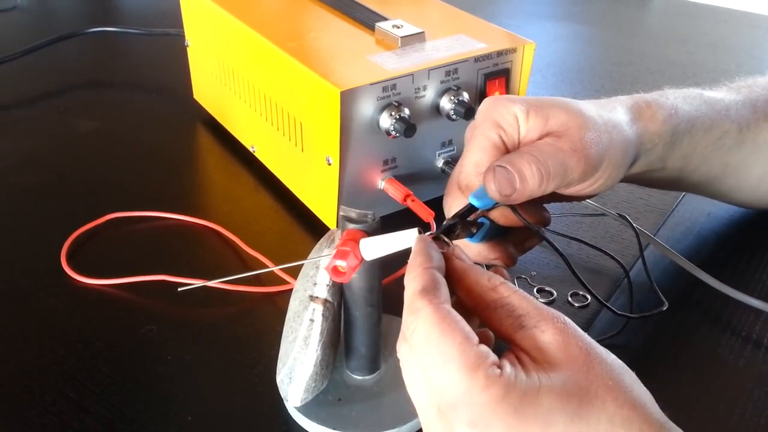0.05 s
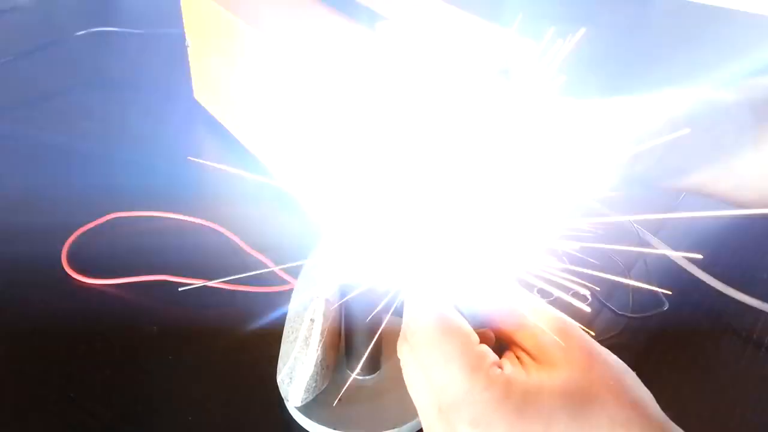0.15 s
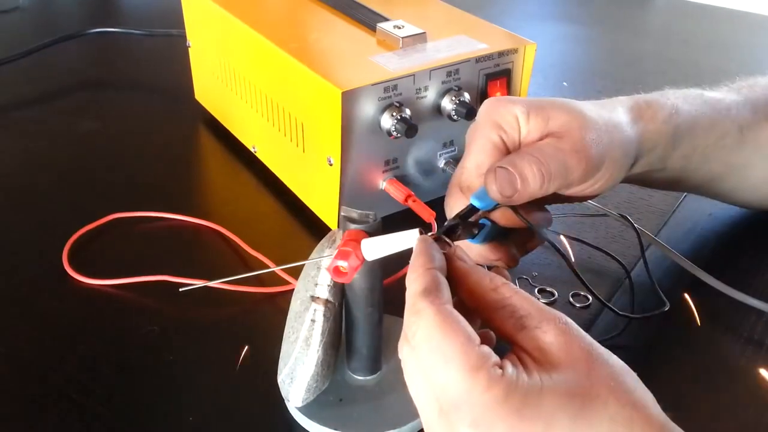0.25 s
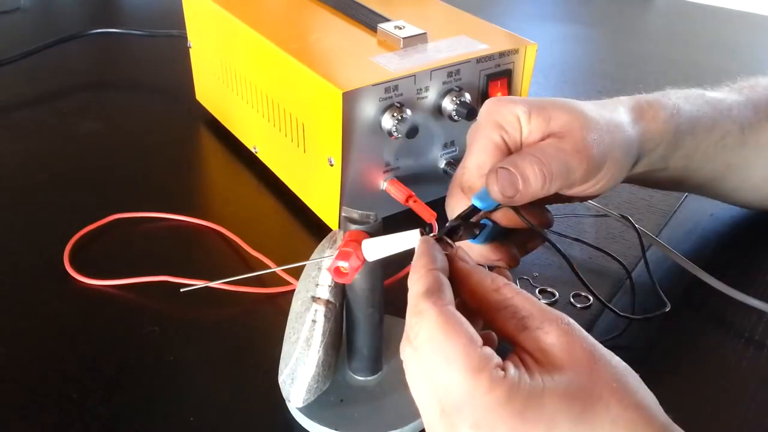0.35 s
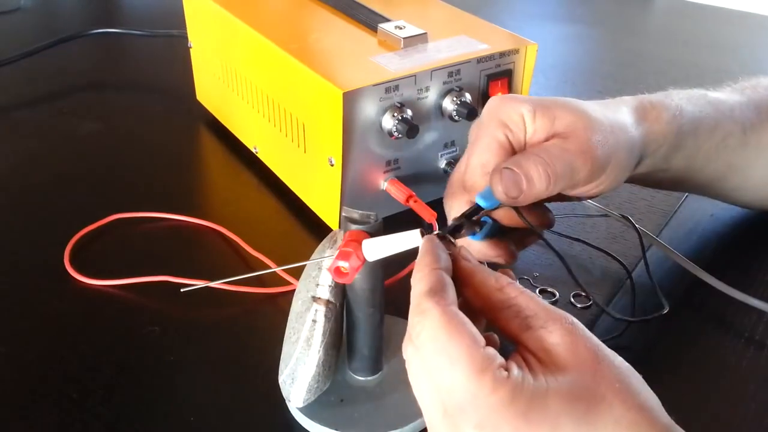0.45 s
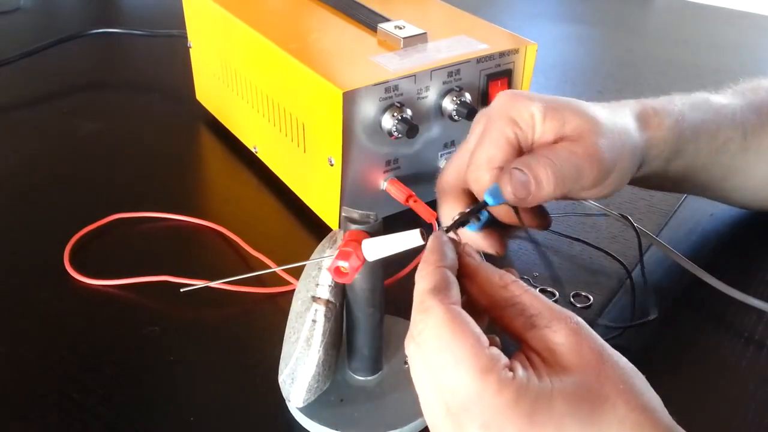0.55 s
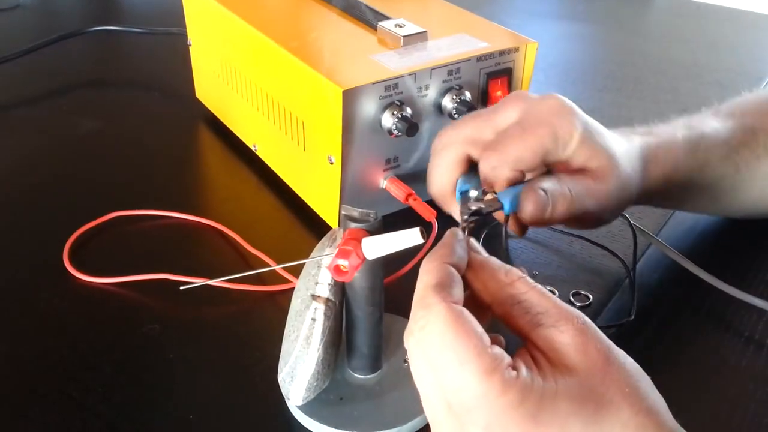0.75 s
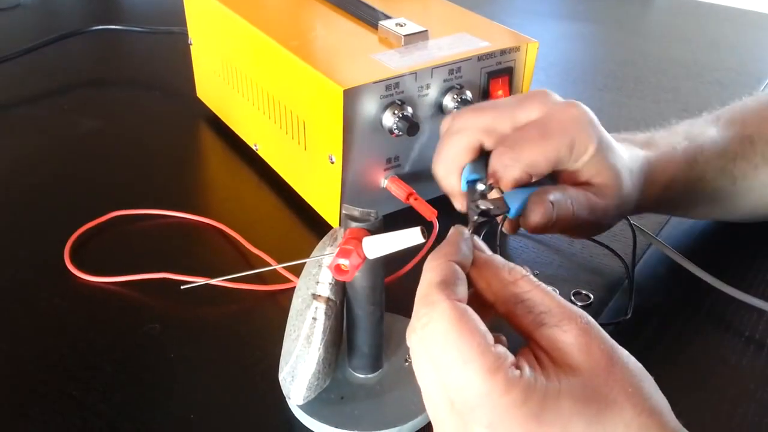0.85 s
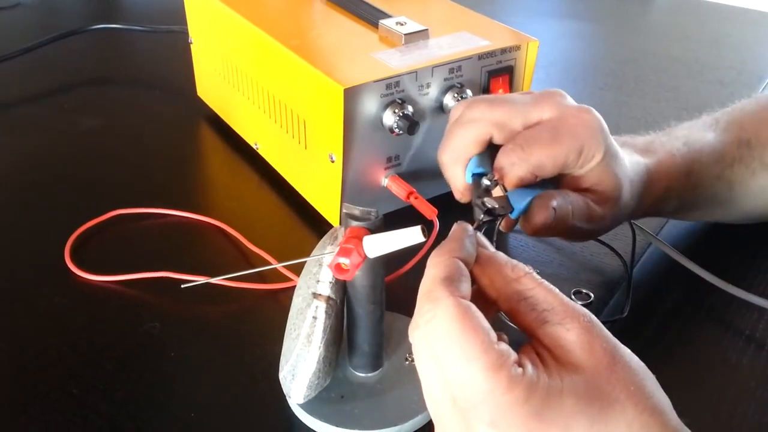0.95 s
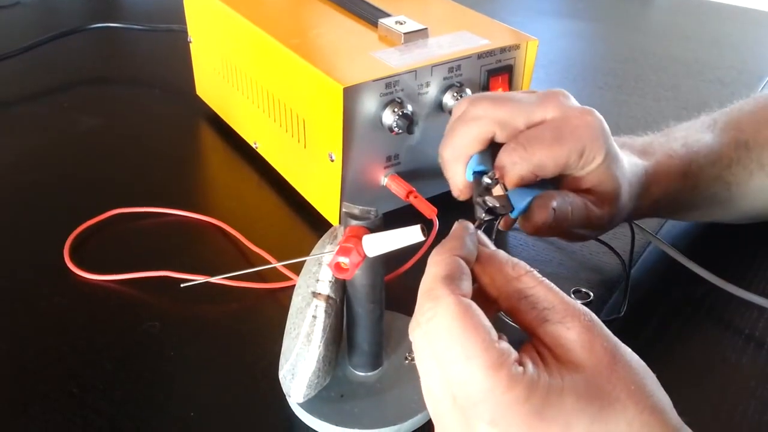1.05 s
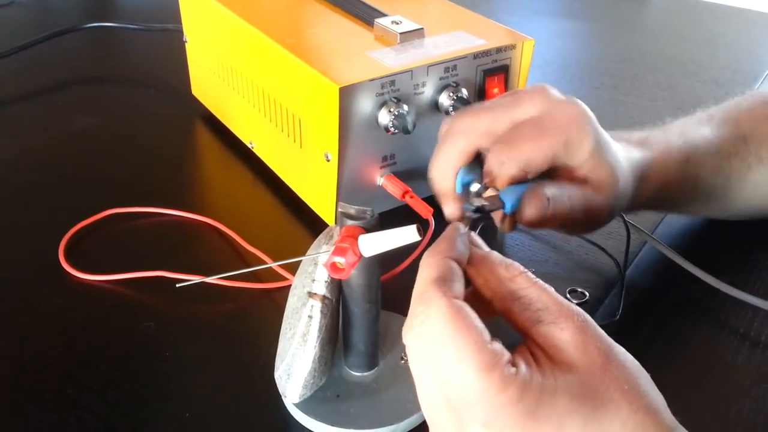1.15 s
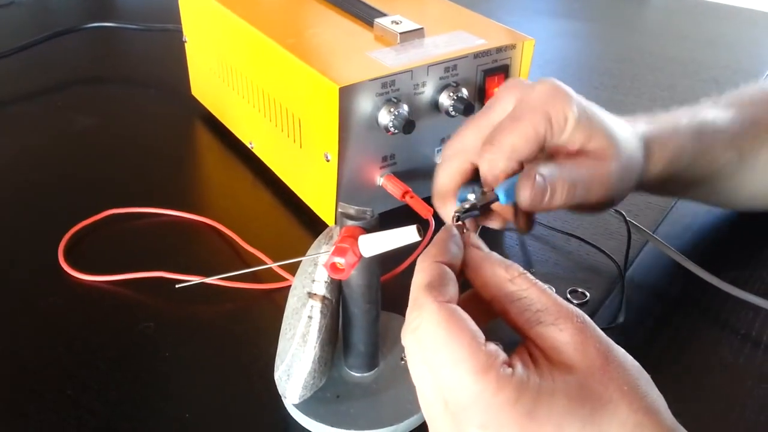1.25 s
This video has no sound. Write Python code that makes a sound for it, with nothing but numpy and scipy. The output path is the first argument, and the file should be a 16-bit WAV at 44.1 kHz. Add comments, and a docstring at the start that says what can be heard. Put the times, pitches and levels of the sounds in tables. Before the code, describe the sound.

One loud, metallic snap from a small welder briefly overloads the microphone, followed by a dull clack and a short, hissing workshop echo. Later, pliers give a tiny tick over quiet room tone and a faint electrical buzz.

```python
"""A faint electrical buzz on the left; then, on the right, a small pulse welder fires with a loud snap.
The arc's pressure pulse and crack ring the metal around it and overload the microphone, and the buzz
swells for a moment. A duller clack follows, probably the welder's switch letting go, and the workshop's
reverberation hisses away. Later the pliers tick faintly over the room tone."""
import sys
import numpy as np
from scipy import signal
from scipy.fft import rfft, irfft, next_fast_len
from scipy.io import wavfile
from scipy.ndimage import uniform_filter1d, minimum_filter1d

SR = 44100
rng = np.random.default_rng(int(sys.argv[2]) if len(sys.argv) > 2 else 0)


def generate_wav(signal):
    """Clip the signal to [-1, 1] and save it as 16-bit WAV at the path in sys.argv[1]."""
    frames = np.transpose(np.atleast_2d(signal))
    scaled = np.clip(frames, -1, 1) * 32767
    pcm = np.round(scaled).astype(np.int16)
    wavfile.write(sys.argv[1], SR, pcm)


N = 57330
TIME = np.arange(N) / SR


def arc():
    """Impulsive excitation: a discharge sends out a pulse and a crack and rings the metal's modes."""
    # Spectra of the pressure pulse and of the discharge noise: f/Hz, relative level/dB
    pulse_spectrum = [(30, -39), (110, -32), (190, -8), (330, 3.5), (520, -2), (750, 4), (1100, -6.5),
                      (1600, 2), (2300, -8.5), (4000, -17.5), (15000, -48)]
    discharge_spectrum = [(60, -50), (300, -25), (800, -20.5), (1400, -17), (2300, -8.5), (3300, -1.5),
                          (5500, 1.5), (7500, -13), (11000, -8.5), (14500, -22)]
    # Modes of the metal around the arc: f/Hz, relative level/dB, T60/s
    metal_modes = [(740.6, -18.5, 0.063), (3127, -17, 0.027), (3374, -10.5, 0.0274), (3899, -1.5, 0.015),
                   (4482, -2.5, .022), (4947, -15.5, .022), (5360, -5, .021), (5545, -4.5, .021),
                   (6820, -11.5, .02), (7757, -17.5, .022), (9250, -9.5, .024), (10310, -16, .028)]
    start_s, rise_s, hold_s = .2229, .00036, .0024
    bounce_delay_s, wall_delay_s, wall_cutoff_hz = .0052, .0345, 4350
    impulse = 1. * (np.arange(N) == round(start_s * SR))
    pulse = minimum_phase(impulse, pulse_spectrum)
    pulse = amp(-4.5) * pulse / np.abs(pulse).max()
    bounce = amp(-8) * np.interp(TIME - bounce_delay_s, TIME, pulse)  # off the bench
    discharge = amp(-8.5) * noise(discharge_spectrum) * strike(start_s, rise_s, hold_s, t60=.026)
    crack = pulse + bounce + discharge
    ring = amp(-3.5) * ringing(metal_modes, start_s, rise_s, hold_s)
    echo = np.interp(TIME - wall_delay_s, TIME, ring)  # one wall returns the ring, its treble dulled
    echo = amp(-14.5) * filtered(echo, lambda hz: 1 / (1 + (hz / wall_cutoff_hz) ** 10))
    return crack + ring + echo + reverberation(amp(-10) * crack + amp(-12) * ring)


def switch():
    """Impact and free vibration: bright contacts click over a dull clack, and the case rings on."""
    # Spectra of the clack and of the contacts: f/Hz, relative level/dB
    clack_spectrum = [(100, -41), (250, -15), (400, -4.5), (570, -1), (830, -1), (1400, -5.5), (2100, -3.5),
                      (2700, -12.5), (4000, -5.5), (5200, -33), (6500, -16.5), (15000, -30)]
    click_spectrum = [(300, -14), (2000, -1.5), (2800, -36), (4000, 3), (5200, 10), (6500, -12.5),
                      (8000, -8.5), (9500, -2.5), (11200, 0.5), (14500, -18)]
    # The contacts' lead-in, blow and rebound: t/s, level/dB, T60/s
    impacts = [(0.397, -25.5, 0.019), (0.3994, -21, 0.013), (0.4016, -28.5, 0.028)]
    # Modes of the welder's sheet-metal case: f/Hz, level/dB, T60/s
    case_modes = [(561, -42, 0.26), (832, -31, 0.18), (4070, -51.5, 0.63), (4570, -63, 0.71),
                  (5150, -57, .45)]
    start_s, rise_s = .3995, .0022
    clack = amp(-20.5) * noise(clack_spectrum) * strike(start_s, rise_s, hold=0, t60=.065)
    clicks = sum(amp(db) * noise(click_spectrum) * strike(at, rise=.0002, hold=0, t60=t60)
                 for at, db, t60 in impacts)
    case = ringing(case_modes, start_s, rise_s, hold=0)
    return clack + clicks + case + reverberation(amp(-9) * clack + amp(-2.5) * clicks)


def pliers():
    """A brief contact has a broad spectrum: one light, dry tick of the pliers."""
    # Spectrum of the tick: f/Hz, relative level/dB
    spectrum = [(300, -14), (2500, -10), (4800, -2.5), (6800, -14), (8400, 1.5), (9800, -10), (14500, -31)]
    return amp(-42) * noise(spectrum) * strike(start=1.0712, rise=.00015, hold=0, t60=.012)


def reverberation(x):
    """The workshop's diffuse field builds up and decays exponentially, the treble fastest."""
    # Reverberation time: f/Hz, T60/s
    decay_times = [(200, .6), (600, .6), (1500, .6), (4000, .6), (9000, 0.47), (15000, .4)]
    # Colour of the diffuse field: f/Hz, relative level/dB
    colour = [(100, -4.5), (400, 0), (780, 2.5), (1150, 5), (1600, -2), (2300, 3), (3000, 2.5), (4200, -4),
              (5500, -7), (7500, 5), (10000, -7), (14500, -2)]
    rise_s = .02
    hz, t, bands = signal.stft(rng.standard_normal(N), SR, nperseg=256)
    decay = np.exp(-np.log(1000) * t / along(decay_times, hz)[:, None])
    bands = bands * amp(along(colour, hz))[:, None] * decay
    tail = signal.istft(bands, SR, nperseg=256)[1][:N] * (1 - np.exp(-TIME / rise_s))
    return signal.fftconvolve(x, tail / np.linalg.norm(tail))[:N]


def buzz():
    """Electrical interference: a nearly periodic pulse train, heard as a buzz over hum and hiss."""
    # Spectra of the ticks and of the line hiss: f/Hz, relative level/dB
    tick_spectrum = [(25, -32), (90, -9), (170, -4.5), (330, 0.5), (550, 2), (900, -13.5), (1500, -11.5),
                     (3000, -25.5), (6000, -42), (15000, -55.5)]
    hiss_spectrum = [(25, -1.5), (150, 6), (400, -1.5), (1000, -9), (3000, -13), (6000, -19.5),
                     (8500, -17.5), (14500, -19.5)]
    # Swell of ticks, thuds, hum and hiss together: t/s, gain/dB
    swell = [(0, -1), (.225, -0.5), (.27, 7), (.33, 7.5), (.48, 6), (.6, 5.5), (.68, 1.5), (.85, .5),
             (1.3, 0)]
    rate_hz, jitter_s, scatter_db = 29.97, .00017, .95
    thud_hz, thud_lag_s, hum_hz = 170, .0042, 59.6

    def thud_response(hz):
        """A damped resonance, low-passed and delayed, trails each tick with a soft thud."""
        resonance = 1j * hz / (thud_hz ** 2 - hz ** 2 + .6j * hz * thud_hz)
        return resonance / (1 + .5j * hz / thud_hz) * np.exp(-2j * np.pi * hz * thud_lag_s)

    starts = np.arange(.0096, N / SR, 1 / rate_hz)
    jitter, scatter = rng.standard_normal((len(starts), 2)).T
    samples = np.abs((starts + jitter_s * jitter) * SR).astype(int)
    pulses = np.bincount(samples, amp(scatter_db * scatter), N)[:N]
    ticks = amp(-63) * unit(minimum_phase(pulses, tick_spectrum))
    thuds = -amp(-64.5) * unit(filtered(pulses, thud_response))
    hum = amp(-68) * unit(np.sin(2 * np.pi * hum_hz * TIME))
    hiss = amp(-62) * noise(hiss_spectrum)
    return amp(np.interp(TIME, *np.transpose(swell))) * (ticks + thuds + hum + hiss)


def room_tone():
    """Stationary noise, strongest in the bass, sets the workshop's noise floor."""
    # Spectrum of the ambient noise: f/Hz, relative level/dB
    spectrum = [(25, -16), (60, -11.5), (115, 2), (200, -3.5), (400, -11), (800, -15.5), (1500, -19),
                (3000, -22.5), (6500, -27.5), (8300, -27), (10000, -25), (14500, -26.5)]
    return amp(-58.5) * noise(spectrum)


def ringing(modes, start, rise, hold):
    """Modal superposition: damped sinusoids excited at one moment."""
    phases = rng.uniform(0, 2 * np.pi, len(modes))
    return sum(amp(db) * np.sin(2 * np.pi * hz * TIME + phase) * strike(start, rise, hold, t60)
               for (hz, db, t60), phase in zip(modes, phases))


def strike(start, rise, hold, t60):
    """Exponential damping: after a quick rise and a hold, the envelope falls 60 dB in t60 seconds."""
    t = np.maximum(TIME - start, 0)
    return (1 - np.exp(-t / rise)) * np.exp(-np.log(1000) * np.maximum(t - hold, 0) / t60)


def noise(spectrum):
    """Spectral shaping: white noise coloured and scaled to rms 1."""
    return unit(filtered(rng.standard_normal(N), lambda hz: amp(along(spectrum, hz))))


def minimum_phase(x, spectrum):
    """Causal filtering: a folded cepstrum colours x with no sound ahead of its pulses."""
    log_gain = np.log(amp(along(spectrum, np.fft.rfftfreq(2 * N, 1 / SR))))
    cepstrum = irfft(log_gain)
    cepstrum[1:N] *= 2
    cepstrum[N + 1:] = 0
    return irfft(rfft(x, 2 * N) * np.exp(rfft(cepstrum)))[:N]


def filtered(x, response):
    """Linear filtering: the spectrum of x times a frequency response."""
    size = next_fast_len(2 * N)
    return irfft(rfft(x, size) * response(np.fft.rfftfreq(size, 1 / SR)), size)[..., :N]


def along(points, hz):
    """Interpolation of (f/Hz, value) points on a logarithmic frequency axis."""
    frequencies, values = np.transpose(points)
    return np.interp(np.log(hz + 1), np.log(frequencies + 1), values)


def amp(db):
    """Decibels to amplitude ratio."""
    return 10 ** (np.asarray(db) / 20)


def unit(x):
    """Normalisation to rms 1."""
    return x / np.sqrt(np.mean(x ** 2) + 1e-20)


def scene():
    """Superposition: the workshop's sounds add on the right; the left carries only the interference."""
    return np.array([buzz(), arc() + switch() + pliers() + room_tone()])


def record(dry):
    """Peak and band limiting: a fast limiter holds the snap down, then a steep low-pass cuts the top."""
    ceiling, cutoff_hz = 1.0, 14800
    needed_gain = np.minimum(1, ceiling / (np.abs(dry) + 1e-9))
    gain = uniform_filter1d(minimum_filter1d(needed_gain, size=15), size=15)
    return filtered(dry * gain, lambda hz: 1 / np.sqrt(1 + (hz / cutoff_hz) ** 160))


dry = scene()
out = record(dry)
generate_wav(out)
```